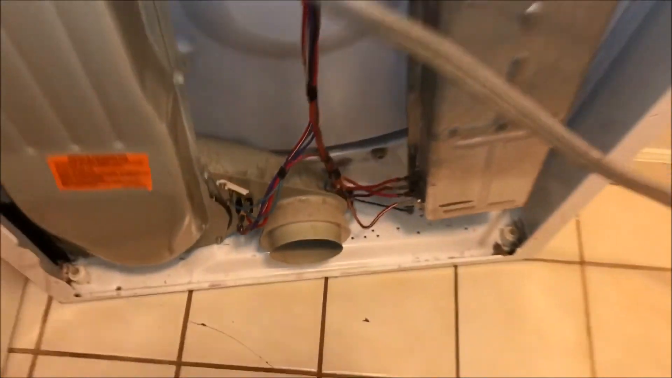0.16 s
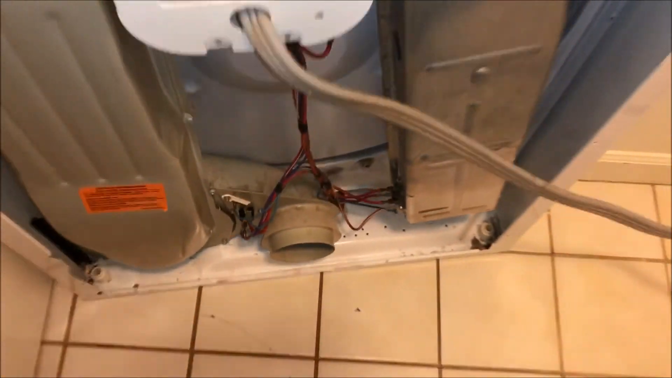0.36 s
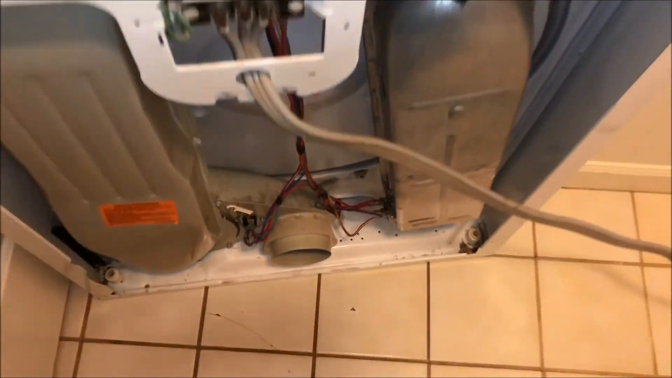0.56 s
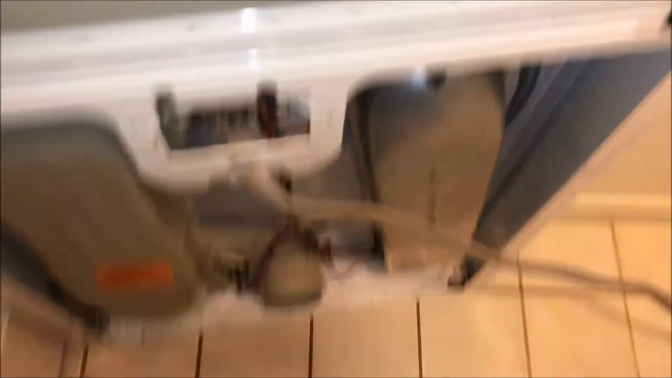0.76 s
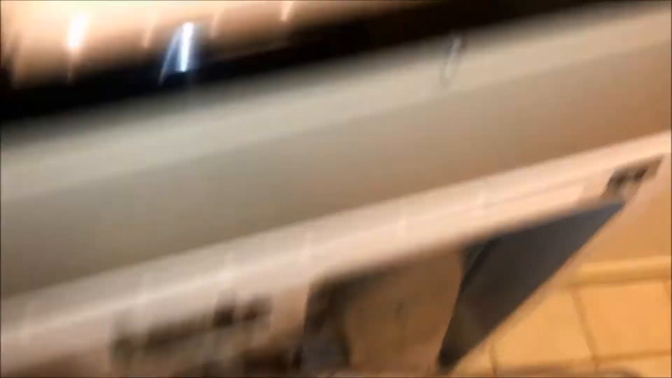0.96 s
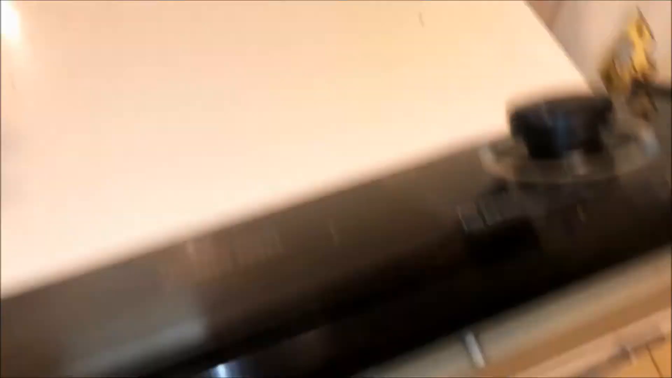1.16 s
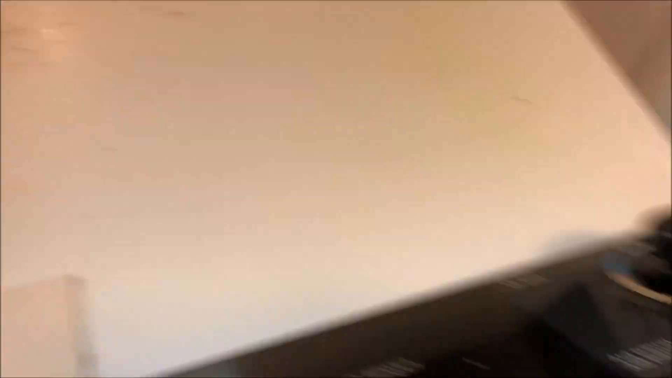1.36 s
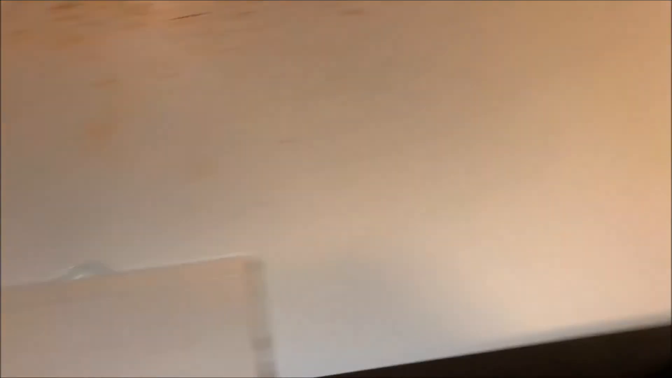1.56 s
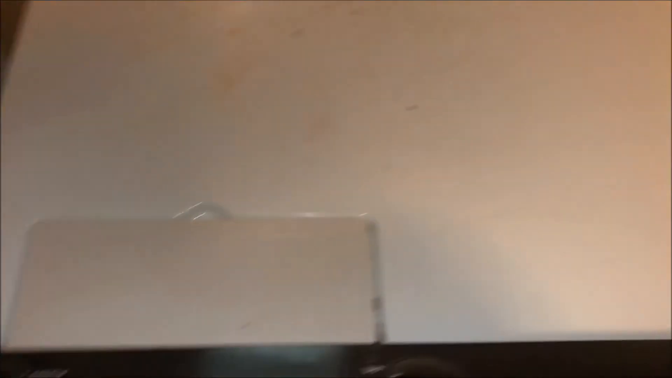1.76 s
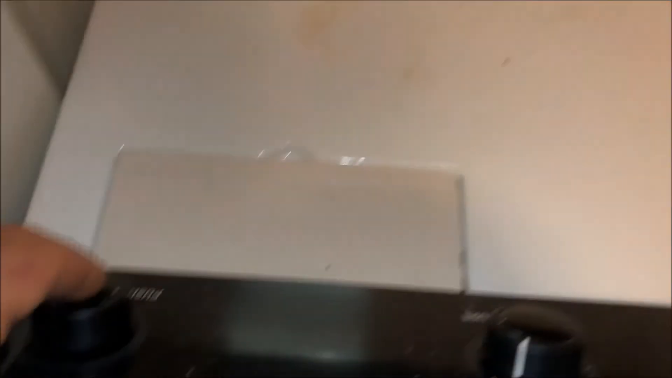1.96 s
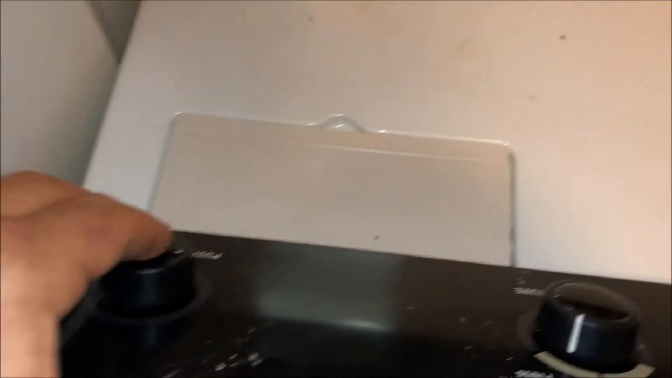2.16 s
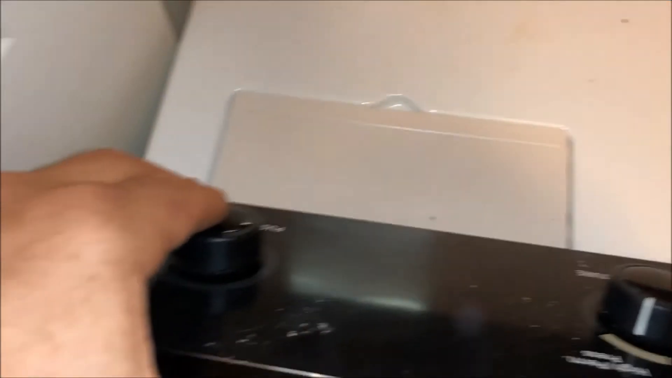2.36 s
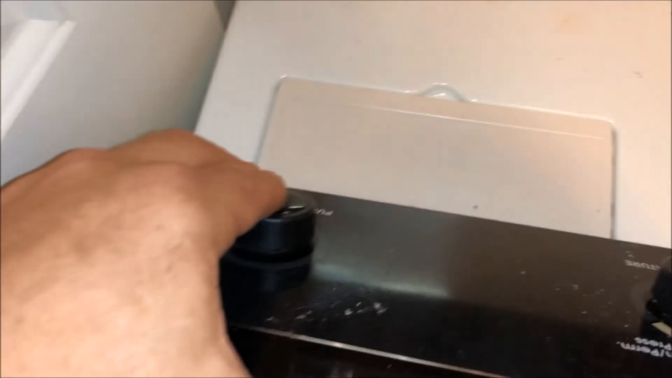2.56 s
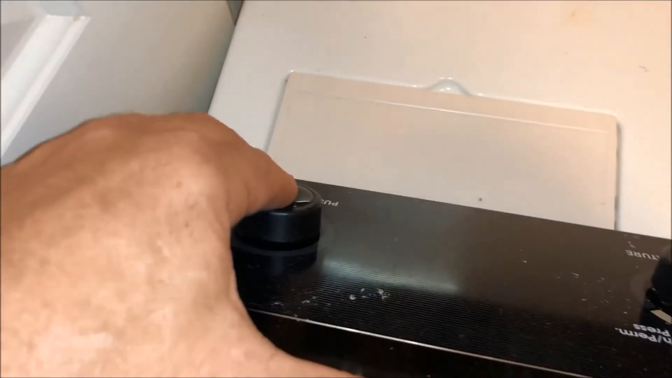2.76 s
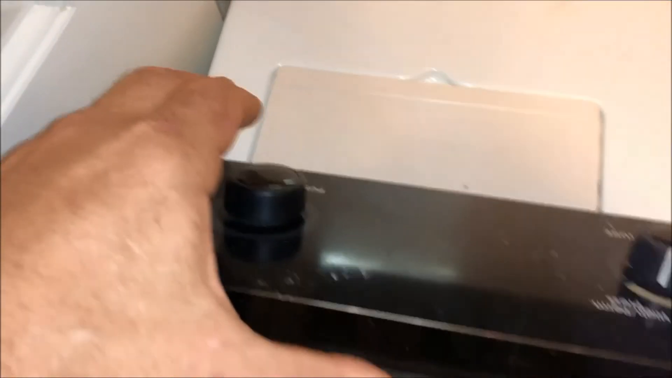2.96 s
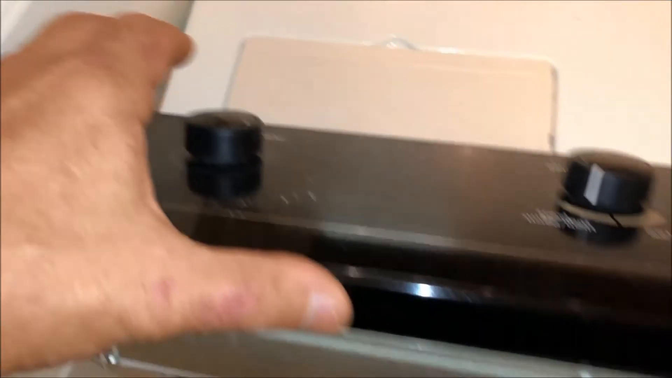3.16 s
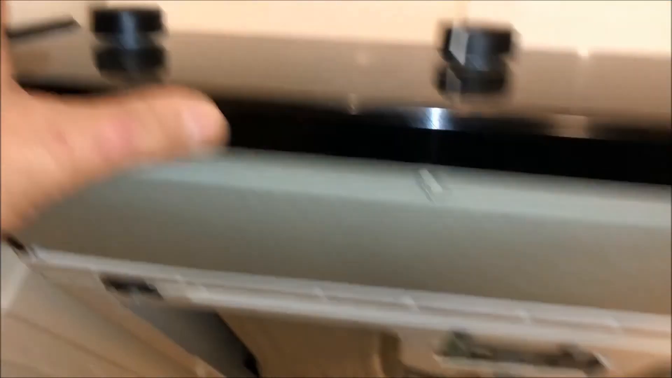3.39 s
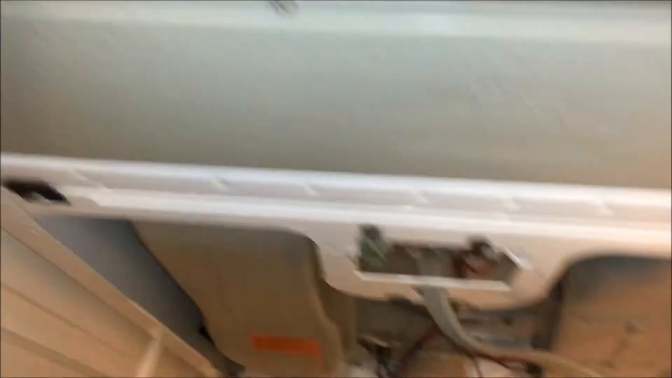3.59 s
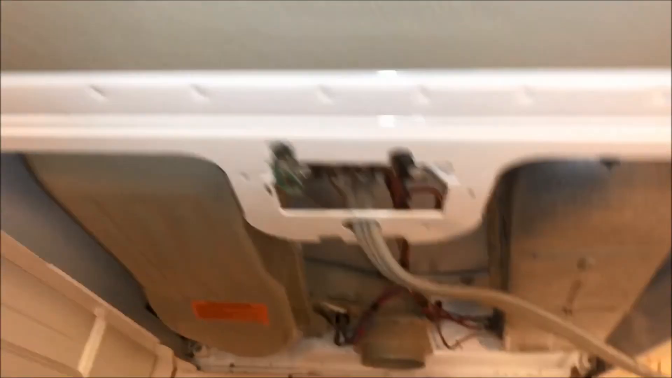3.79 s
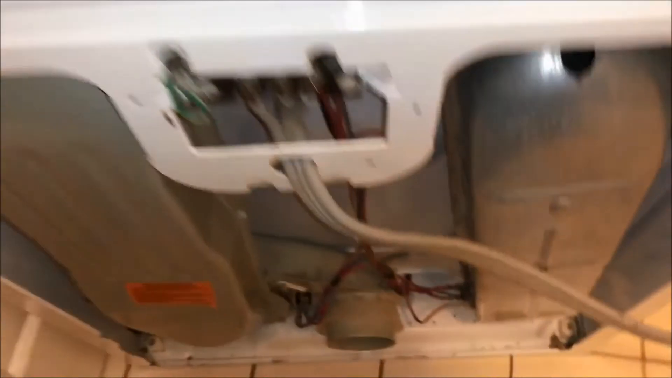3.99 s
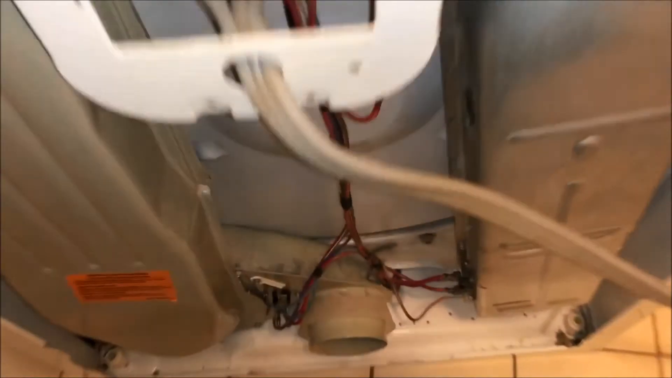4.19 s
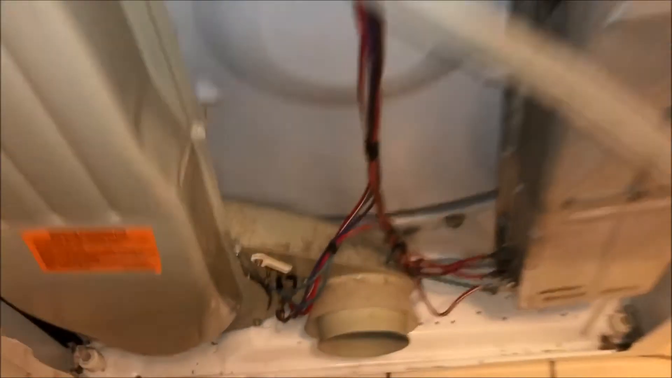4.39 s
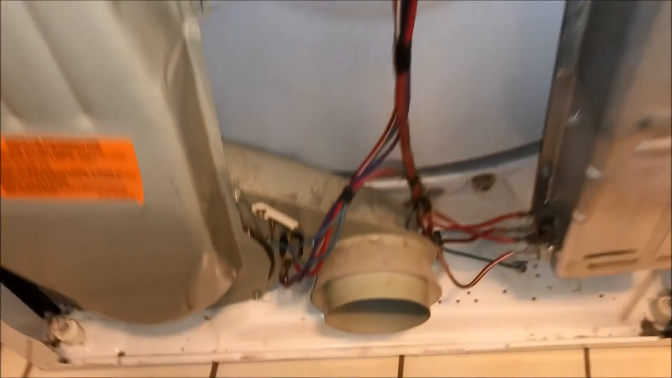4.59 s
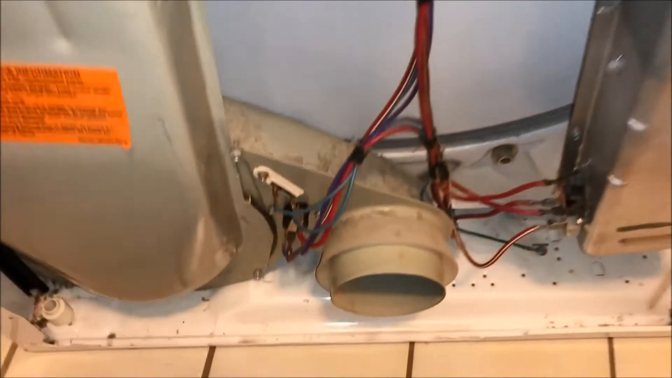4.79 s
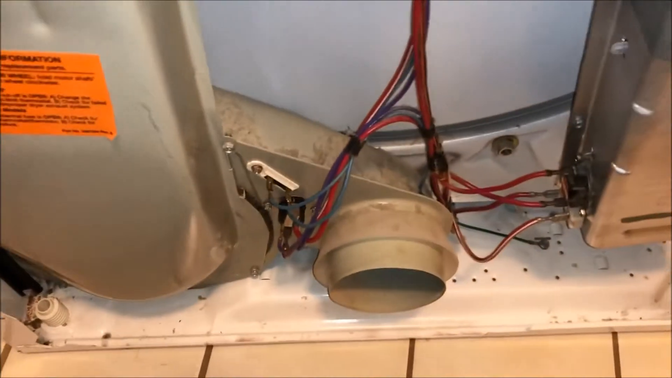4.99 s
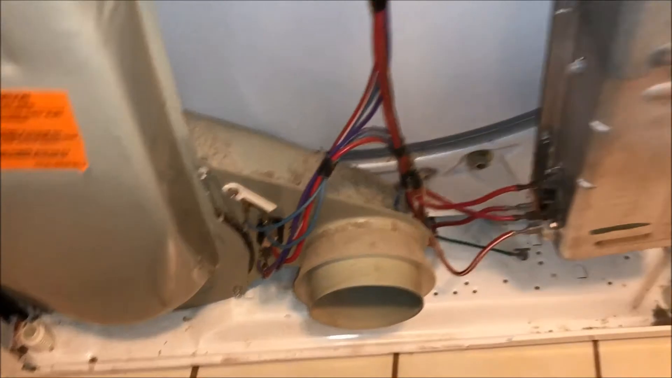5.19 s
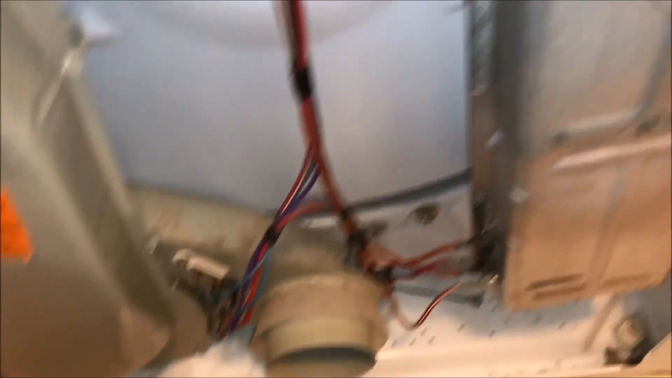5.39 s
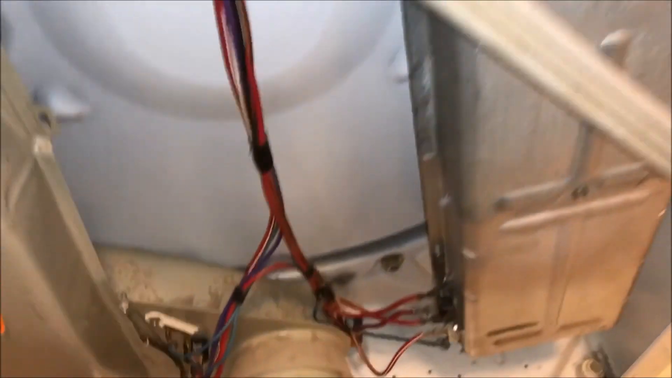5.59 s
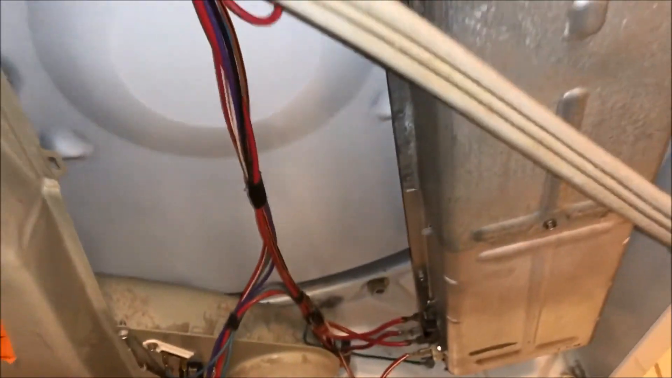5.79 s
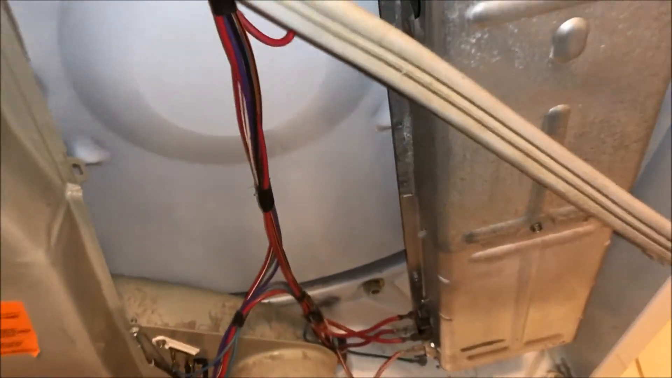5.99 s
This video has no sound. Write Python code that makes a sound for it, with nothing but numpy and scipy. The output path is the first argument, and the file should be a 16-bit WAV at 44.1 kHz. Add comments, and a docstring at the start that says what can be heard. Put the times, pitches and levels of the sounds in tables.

```python
"""An electric clothes dryer with its back panel off starts in a small tiled room.
First its timer ticks four times a second in muffled noise thumps; a sleeve and a sole rub past in grainy noise.
The switch clicks, the motor kicks its mount into ringing and hums, the belt squeals in rough gliding tones, and
the starting switch springs open. Drum and blower, noise shaped by cabinet resonances, settle into a humming
rush that grows as the microphone nears the open back."""
import sys
import numpy as np
from scipy import signal
from scipy.fft import rfft, irfft, next_fast_len
from scipy.io import wavfile
from scipy.ndimage import uniform_filter1d, map_coordinates

SR = 44100
rng = np.random.default_rng(int(sys.argv[2]) if len(sys.argv) > 2 else 0)


def transcribe(signal):
    """Save signal, clipped to [-1, 1], as a 16-bit WAV file at the path in sys.argv[1]."""
    frames = np.atleast_2d(signal).T
    limited = np.clip(frames, -1, 1)
    pcm = np.round(limited * 32767).astype(np.int16)
    wavfile.write(sys.argv[1], SR, pcm)


N = 266672
TIME = np.arange(N) / SR

HUM_HZ, SHAFT_HZ = 120, 29.2
POWER_S, POWER_RISE_S = 2.692, 0.033
LOAD_PEAK_S, LOAD_RISE_DB_PER_S, LOAD_FALL_DB_PER_S = 3.126, 40, 34  # hardest pull: drum taking up speed
SETTLE_S = 3.96

# Motor and blower tones: shaft_multiple, level_db at the open back
WHINE_TONES = [(20, -47.5), (23, -50), (30, -50), (40, -49), (52, -59), (60, -55.5)]


def motor(whine_follow=0.47, panel_db=-39, groan_db=-33):
    """Mains hum, a groan under load, shaft-locked wavering tones, and a panel that sings as the drum settles."""
    shaft_turns = np.cumsum(SHAFT_HZ * (1 + 0.003 * wobble(4))) / SR
    whine = np.zeros(N)
    for multiple, level_db in WHINE_TONES:
        phase = 2 * np.pi * np.round(multiple) * shaft_turns + 0.58 * wobble(30)
        whine += amp(level_db + 3.2 * wobble(6)) * np.sin(phase)
    whine *= amp(whine_follow * nearness()) * run_up(0.6) ** 2

    panel_level = amp(panel_db + 2.8 * wobble(13)) * swell(SETTLE_S, 14, 16) * run_up(0.9) ** 2
    panel = panel_level * np.sin(2 * np.pi * 436 * TIME + 1.45 * wobble(24))

    load = swell(LOAD_PEAK_S, LOAD_RISE_DB_PER_S, LOAD_FALL_DB_PER_S)
    groan = amp(groan_db) * load * noise([(150, -32), (215, 7), (260, 1), (330, -7), (500, -46)])
    return mains_hum() + np.sqrt(2) * (whine + panel) + groan


def mains_hum(octave_db=-33.5, octave_follow=0.39, inrush_db=-27, inrush_t60_s=0.58, loaded_db=-29):
    """Iron hums at twice the mains rate; starting current and load strengthen the octave above."""
    near_db = nearness()
    phase = 2 * np.pi * HUM_HZ * TIME
    first = amp(-25.5 + near_db + 0.5 * wobble(12)) * run_up(0.19)
    inrush = amp(inrush_db) * fade(TIME - POWER_S, inrush_t60_s, 0.0069)
    loaded = amp(loaded_db) * swell(LOAD_PEAK_S + 0.062, 38, 40)
    second = np.hypot(amp(octave_db + octave_follow * near_db), inrush + loaded) * amp(1.66 * wobble(18))
    # the octave's phase wavers most at the start
    waver = (0.13 + 0.5 * (1 - run_up(0.8))) * wobble(12)
    return np.sqrt(2) * (first * np.sin(phase + 0.034 * wobble(24)) + second * np.sin(2 * phase + waver))


SPIN_UP_S, HISS_LAG_S = 0.35, 0.95  # to full speed; to full vent flow

# Drum rumble spectrum: freq_hz, relative_db
DRUM = [(25, -35), (45, -28), (60, -15.5), (98, -10.5), (150, -1), (180, 3), (212, -4.5), (255, -3.5),
        (300, -4.5), (400, -11), (520, -20.5), (900, -57)]
# Duct rush spectrum: freq_hz, relative_db
DUCT = [(200, -36), (380, -8.5), (490, 2.5), (700, -6.5), (1000, -6), (1300, -10), (2500, -44)]
# Airflow spectrum: freq_hz, relative_db
AIR = [(700, -13), (1200, -1), (1600, 2.5), (2000, 2), (2600, -1), (3300, -5), (3800, -6.5), (6000, -12.5),
       (9000, -22), (16000, -56)]
# Vent hiss spectrum: freq_hz, relative_db
HISS = [(2500, -18), (4500, 7.5), (7000, 7.5), (10000, 3.5), (16000, -4)]
# Cabinet and duct resonances: centre_hz, width_hz, lift_db
CABINET = [(412, 20, 5), (503, 62, -1), (682, 123, 5.5), (865, 25, 2), (1140, 37, 2.5), (1359, 114, -4),
           (1416, 44, 8), (1530, 56, 4.5), (2050, 43, -6), (2660, 51, 6), (2750, 200, -2), (3000, 270, 2)]


def drum_and_blower(tumble_db=0.46, flutter_db=1.0):
    """The drum rumbles on rollers, air rushes through resonant ducts and hisses out; each follows nearness."""
    near_db, speed = nearness(), run_up(SPIN_UP_S)

    def level(db, follow, at_rest):
        return amp(db + follow * near_db) * (at_rest + (1 - at_rest) * speed ** 4)

    drum = level(-29, follow=0.3, at_rest=0.51) * amp(tumble_db * wobble(21)) * noise(DRUM, CABINET)
    duct = level(-36, follow=0.21, at_rest=0.39) * amp(flutter_db * wobble(30))
    duct = duct * drifting(noise(DUCT, CABINET), depth_db=2.0)
    air = level(-37.5, follow=0.35, at_rest=0.25) * amp(flutter_db * wobble(60))
    air = air * drifting(noise(AIR, CABINET), depth_db=1.9)
    hiss = amp(-52 + 0.32 * near_db + 0.68 * wobble(8)) * run_up(HISS_LAG_S) ** 2 * noise(HISS)

    # throb and whirr carry through the open back, so they follow nearness most
    throb_level = amp(-42.5 + 0.71 * near_db + 1.4 * wobble(10))
    throb = throb_level * noise([(28, -20), (46, 9), (85, 10), (130, -31)])
    whirr_level = amp(-48.5 + 0.7 * near_db + 3.2 * wobble(16)) * run_up(0.8) ** 2
    whirr = whirr_level * noise([(2800, -32), (3200, -3), (3600, -31.5)])
    return drum + duct + air + hiss + throb + whirr + drum_strain()


# Drum dragged into motion, spectrum: freq_hz, relative_db
DRAG = [(150, -25), (350, -14), (500, 2.5), (700, -1.5), (900, -1), (1150, -8), (1700, -10), (3000, -35)]
# Soft drum bumps: start_s, level_db (before a common +3 dB)
BUMPS = [(2.72, -37), (3.05, -35), (4.41, -33), (5.43, -31)]
# Bump spectrum: freq_hz, relative_db
BUMP = [(28, -25), (48, -7), (85, -3), (130, -21), (300, -53)]


def drum_strain(drag_db=-31.0, bump_t60_s=0.42, bump_attack_s=0.033):
    """The drum roars briefly as the belt drags it into motion, and bumps softly on its rollers."""
    drag = amp(drag_db) * swell(3.115, 85, 56) * noise(DRAG, CABINET)
    bumps = sum(amp(db) * fade(TIME - s, bump_t60_s, bump_attack_s) for s, db in BUMPS)
    return drag + amp(3) * bumps * noise(BUMP)


# Belt squeals: start_s, length_s, pitch_hz, glide_hz, level_db
SQUEALS = [(2.738, 0.125, 7850, -63, -40.5), (2.846, 0.062, 7770, 10, -52), (2.94, 0.06, 8080, 94, -39),
           (3.05, .085, 7810, 110, -37), (3.139, 0.04, 8060, 22, -34), (3.198, 0.075, 8130, -90, -51.5),
           (3.403, 0.072, 7900, -3.5, -54)]
# Dry scrapes of belt and drum: start_s, level_db, t60_s
SCRAPES = [(2.718, -44.5, 0.28), (2.963, -30.5, 0.36), (3.04, -43, 0.14), (3.973, -37, 0.17),
           (4.418, -36, 0.15), (4.678, -44.5, 0.25), (4.832, -38, 0.15), (5.739, -38.5, 0.078),
           (5.917, -37, 0.17)]
# Scrape spectrum: freq_hz, relative_db
SCRAPE = [(800, -24), (2500, 6.5), (6000, 4.5), (10000, 0.5), (16000, -4)]


def belt(rough=0.97):
    """The belt slips on the pulley in thin, phase-roughened squeals and dry noise scrapes."""
    squeal = np.zeros(N)
    for start_s, length_s, pitch_hz, glide_hz, level_db in SQUEALS:
        progress = np.clip((TIME - start_s) / length_s, 0, 1)
        grip = np.sin(np.pi * progress ** 0.53) ** 2
        phase = 2 * np.pi * np.cumsum(pitch_hz + glide_hz * progress) / SR
        squeal += amp(level_db) * np.sqrt(grip) * np.sin(phase + rough * wobble(500))
    squeal *= amp(2.4 * wobble(160))
    scrape_level = sum(amp(db) * fade(TIME - s, t60_s, 0.0023) for s, db, t60_s in SCRAPES)
    scrape = noise(SCRAPE) * amp(0.5 * wobble(500)) * scrape_level
    return room(squeal, wet_db=-3.0) + scrape


# Motor blows on its mount: start_s, level_db
CLUNKS = [(2.6925, -24.5), (2.6962, -23), (2.9155, -19.5), (2.9205, -21)]
# Mount modes: freq_hz, relative_db, t60_s
MOUNT = [(313, -7, 0.16), (464, -4.5, 0.059), (580, -18, 0.058), (1128, -3, 0.032), (1480, 1, 0.029),
         (2890, -17, 0.021)]
# Mount clatter spectrum: freq_hz, relative_db
CRASH = [(150, -12.5), (400, 13), (800, -9), (1500, 3), (2100, -15), (2900, -14.5), (4300, -22),
         (6500, -16.5), (10000, -33), (16000, -41)]


def motor_kick():
    """The motor's torque knocks its mount, which rings and clatters in the room."""
    return room(struck(CLUNKS, MOUNT, CRASH, clatter_db=2.5, clatter_t60_s=0.022), wet_db=-7.5)


# Starting-switch hits: start_s, level_db
SPRING_HITS = [(2.9048, -29), (2.908, -31.5)]
# Spring modes: freq_hz, relative_db, t60_s
SPRING = [(6200, -13, 0.087), (11380, -4, 0.053), (11670, -6, .06), (12800, -14, .05), (13800, -4, 0.04),
          (14200, -3, 0.018)]
# Snap spectrum: freq_hz, relative_db
SNAP = [(2000, -6), (4500, -11), (9000, -9), (11500, -7), (14000, 2), (16000, -9)]


def starting_switch():
    """The starting switch springs open: high spring modes ring over a short snap."""
    return room(struck(SPRING_HITS, SPRING, SNAP, clatter_db=-1.5, clatter_t60_s=0.023), wet_db=-1.0)


def struck(blows, modes, clatter, clatter_db, clatter_t60_s):
    """Each blow rings the strong modes at slightly new strengths and pitches, over a short dense clatter."""
    out, t = np.zeros(N), np.arange(SR // 4) / SR
    for start_s, level_db in blows:
        ring = np.zeros(len(t))
        for freq_hz, mode_db, t60_s in modes:
            tone = np.sin(2 * np.pi * freq_hz * rng.normal(1, 0.0049) * t)
            ring += amp(mode_db + rng.normal(0, 1)) * tone * fade(t, t60_s, 0.001)
        add(out, start_s, amp(level_db) * ring)
    clatter_level = sum(amp(db) * fade(TIME - s, clatter_t60_s, 0.0005) for s, db in blows)
    return out + amp(clatter_db) * noise(clatter) * clatter_level


# Small clicks, knocks, rattles: start_s, level_db, centre_hz, width_octaves, t60_s, room_db
CLICKS = [(.454, -31.5, 1440, 1, 0.027, -5), (.455, -33.5, 474, 0.82, 0.03, -3),
          (0.618, -38, 3980, 0.82, .008, -10), (1.187, -48.5, 1030, 0.27, 0.095, -3),
          (1.306, -49.5, 4370, 0.55, 0.027, -2.5), (2.03, -47, 4340, 0.44, 0.018, -13),
          (2.655, -40, 4300, 0.83, 0.041, -3.5), (2.661, -42, 474, 0.43, 0.54, -2),
          (2.695, -44.5, 2560, 0.2, 0.28, -7), (2.9, -24.5, 275, 0.38, 0.22, -10),
          (3.974, -38, 12500, 0.77, .12, -8), (5.739, -41.5, 12500, .5, .06, -6),
          (5.962, -27, 5800, 0.75, 0.076, -3), (5.967, -30, 7080, .02, 0.091, -10)]


def clicks():
    """Light contacts: brief noise bursts, each around its own pitch with its own share of room."""
    out, t = np.zeros(N), np.arange(SR // 2) / SR
    for start_s, level_db, centre_hz, width_octaves, t60_s, room_db in CLICKS:
        def band(hz):
            octaves_off = np.abs(np.log2((hz + 1) / centre_hz))
            return 1 / (1 + (octaves_off / width_octaves) ** 4.2)

        burst = unit(filtered(rng.standard_normal(len(t)), band))
        add(out, start_s, room(amp(level_db) * burst * fade(t, t60_s, 0.00023), room_db))
    return out


FIRST_TICK_S, TICK_PERIOD_S, COCK_LEAD_S = 0.0018, 0.2498, 0.0606
TICK_DB, COCK_DB, CATCH_DB = -52, -61.5, -62
# Tick spectrum: freq_hz, relative_db
TICK = [(88, -61), (150, -10.5), (273, -1), (441, -2.5), (524, -7), (611, -1.5), (804, -12.5), (906, -6),
        (1650, -12), (2250, -29), (2810, -27), (5290, -34), (9000, -41), (11700, -81), (19800, -120)]


def timer(rise_s=0.033, t60_s=0.21, catch_s=0.0185, count=11):
    """Evenly spaced muffled ticks: a faint cocking sound, a swelling thump, a brighter tooth catch inside it."""
    ticks_s = FIRST_TICK_S + TICK_PERIOD_S * np.arange(count)
    beat = sum(fade(TIME - s, t60_s, rise_s) for s in ticks_s) / fade(TIME, t60_s, rise_s).max()
    cock = sum(fade(TIME - s + COCK_LEAD_S, 0.21, 0.0022) for s in ticks_s)
    catch = sum(amp(rng.normal(0, 1)) * fade(TIME - s - catch_s, 0.052, 0.001) for s in ticks_s)
    pawl = noise([(500, -11), (1500, -7), (2500, -42), (9000, -38)])
    tooth = noise([(900, -20), (1600, -4), (3200, 4), (4200, -13), (7000, -20), (10000, -35)])
    return amp(TICK_DB) * beat * noise(TICK) + amp(COCK_DB) * cock * pawl + amp(CATCH_DB) * catch * tooth


# Sleeve brushes, and a grainy tail after the knock at 0.454 s: peak_s, level_db, rise_db_per_s, fall_db_per_s
BRUSHES = [(.015, -55.5, 300, 130), (.46, -58, 84, 90), (.634, -42.5, 201, 175), (.765, -60.5, 900, 110)]
# Sleeve cloth spectrum: freq_hz, relative_db
CLOTH = [(180, -45), (300, -15), (433, -2.5), (593, -21), (828, -5.5), (1320, -9.5), (3890, -9.5),
         (16000, -28.5)]
# Sole slides on tiles: peak_s, level_db, rise_db_per_s, fall_db_per_s
SLIDES = [(.845, -44.5, 1100, 105), (.94, -50.5, 1000, 200), (1.006, -53, 200, 117),
          (1.194, -61.5, 600, 92)]
# Sole spectrum: freq_hz, relative_db
SOLE = [(240, -40), (400, -13), (460, 0), (676, -14), (879, -10), (3310, -3.5), (16000, -15)]


def rustle():
    """A sleeve brushes past; a foot lands softly and slides on the tiles; a moving hand rumbles faintly."""
    step = noise([(30, -23), (90, -11), (170, -2), (300, -21), (900, -57)]) * fade(TIME - 0.845, 0.37, 0.0078)
    handling = noise([(20, -22), (45, 0), (90, -3), (200, -28)]) * np.interp(TIME, [1.05, 1.3], [1, 0])
    sleeve = rubbing(BRUSHES, CLOTH, grain_db=2.5)
    sole = rubbing(SLIDES, SOLE, grain_db=2.0)
    return sleeve + sole + amp(-44) * step + amp(-67) * handling


def rubbing(strokes, spectrum, grain_db):
    """Friction in fine uneven grains; each stroke swells and dies away."""
    power = sum((amp(db) * swell(s, rise, fall)) ** 2 for s, db, rise, fall in strokes)
    return np.sqrt(power) * unit(noise(spectrum) * amp(grain_db * wobble(400)))


# Quiet-room spectrum: freq_hz, relative_db
QUIET = [(18, -69), (30, -35), (64, -15), (90, -7.5), (131, -11.5), (179, -7), (273, -8.5), (760, -20),
         (6550, -35), (9220, -34.5), (16000, -44)]


def quiet_room():
    """Low steady room noise with a faint tone at the hum pitch."""
    return amp(-65.5) * noise(QUIET) + amp(-66) * np.sin(2 * np.pi * HUM_HZ * TIME)


# Tiled-room decay: freq_hz, t60_s
ROOM = [(150, 0.21), (1500, 0.4), (5000, 0.32), (14000, 0.18)]


def room(x, wet_db):
    """Add a short decaying noise tail, as between tiled walls, that dies at its own rate per frequency."""
    hz, t, z = signal.stft(rng.standard_normal(SR // 2), SR, nperseg=256)
    tail = signal.istft(z * np.exp(-np.log(1000) * t / along(ROOM, hz)[:, None]), SR)[1]
    return x + amp(wet_db) * signal.fftconvolve(x, tail / np.linalg.norm(tail))[:len(x)]


CLOSE_DB = -25  # hum level right at the open back
# Microphone approach, as motor hum level: time_s, level_db
NEAR = [(3.3, -39.5), (4.02, -35), (4.76, -26), (5.95, -28.5)]


def nearness():
    """Direct motor sound in dB relative to its level at the open back."""
    time_s, level_db = np.transpose(NEAR)
    return np.interp(TIME, time_s, level_db) - CLOSE_DB


def drifting(x, depth_db):
    """Narrow bands swell and fade at random, like standing waves shifting past a moving microphone."""
    z = signal.stft(x, nperseg=2048)[2]
    field = uniform_filter1d(rng.standard_normal(z.shape), size=4, axis=0)  # across frequency
    field = uniform_filter1d(field, size=14, axis=1)  # across time
    return unit(signal.istft(z * amp(depth_db * unit(field)))[1][:N])


def run_up(seconds):
    """Ramp from 0 to 1 over so many seconds from power-on."""
    return np.clip((TIME - POWER_S) / seconds, 0, 1)


def swell(peak_s, rise_db_per_s, fall_db_per_s):
    """Gain that climbs to 1 at peak_s, then dies away, linearly in dB."""
    return amp(np.minimum(rise_db_per_s * (TIME - peak_s), fall_db_per_s * (peak_s - TIME)))


def fade(t, t60_s, attack_s):
    """A quick rise at t = 0, then an exponential decay."""
    t = np.maximum(t, 0)
    return (1 - np.exp(-t / attack_s)) * np.exp(-np.log(1000) * t / t60_s)


def wobble(rate_hz):
    """A smooth random curve with rate_hz knots a second."""
    knots = rng.standard_normal(int(N * rate_hz / SR) + 4)
    return map_coordinates(knots, [TIME * rate_hz])


def noise(spectrum, resonances=()):
    """Noise of rms 1 with a broad spectrum and narrow resonances on it."""
    def gain(hz):
        lift = sum(db * np.exp(-2 * ((hz - centre) / width) ** 2) for centre, width, db in resonances)
        return amp(along(spectrum, hz) + lift)

    return unit(filtered(rng.standard_normal(N), gain))


def filtered(x, gain):
    """Apply a frequency-dependent gain, zero-padded."""
    m = next_fast_len(len(x) + 8192)
    return irfft(rfft(x, m) * gain(np.fft.rfftfreq(m, 1 / SR)), m)[:len(x)]


def along(points, hz):
    """Interpolate (freq_hz, value) points on a log frequency axis."""
    f, v = np.transpose(points)
    return np.interp(np.log(hz + 1), np.log(f + 1), v)


def add(track, start_s, sound):
    """Mix a short sound into the track at start_s."""
    part = track[round(start_s * SR):][:len(sound)]
    part += sound[:len(part)]


def amp(db):
    """Decibels to gain."""
    return 10 ** (np.asarray(db) / 20)


def unit(x):
    """Scale to rms 1."""
    return x / np.sqrt(np.mean(x ** 2) + 1e-20)


def scene():
    """The running dryer, its start, the small sounds before it, and the quiet room."""
    running = run_up(POWER_RISE_S) * (motor() + drum_and_blower())
    start = belt() + motor_kick() + starting_switch()
    small = clicks() + timer() + rustle()
    return (running + start + small + quiet_room())[None]


TOP_HZ = 15900


def record(dry):
    """Band limit: nothing is kept at or above TOP_HZ."""
    return np.array([filtered(x, lambda hz: hz < TOP_HZ) for x in dry])


dry = scene()
out = record(dry)
transcribe(out)
```